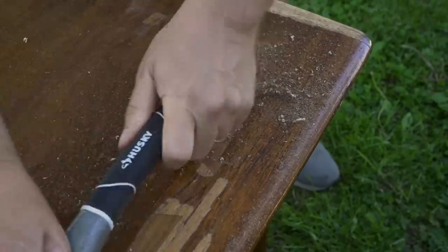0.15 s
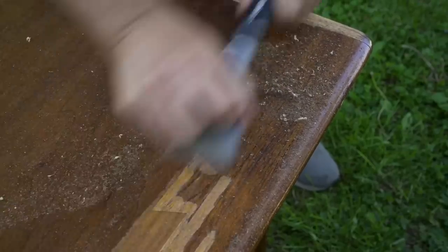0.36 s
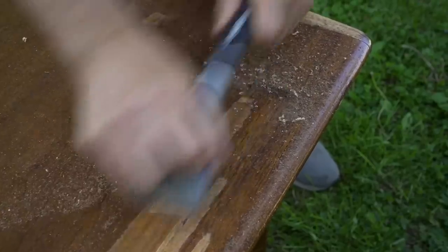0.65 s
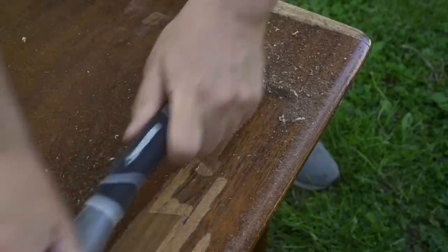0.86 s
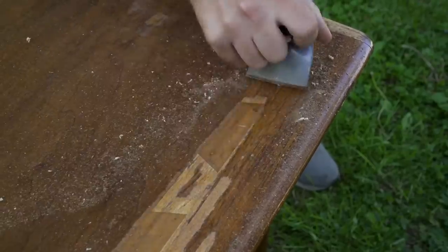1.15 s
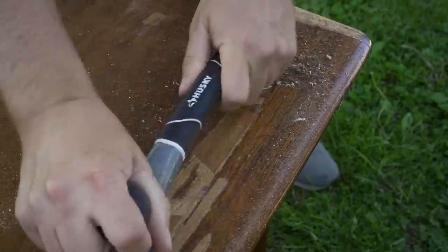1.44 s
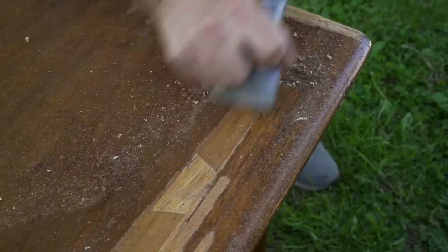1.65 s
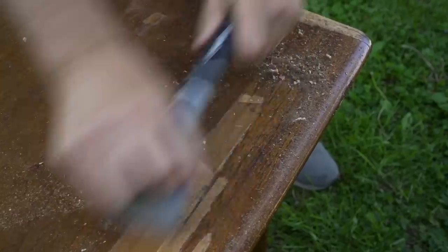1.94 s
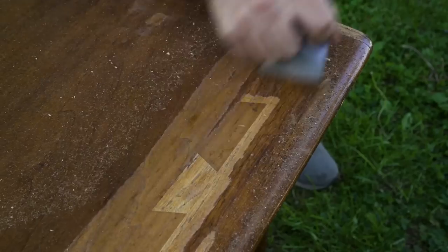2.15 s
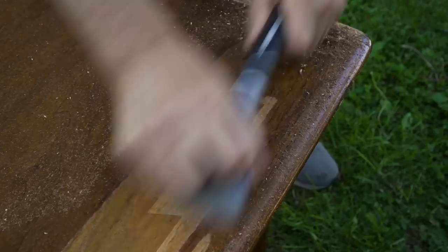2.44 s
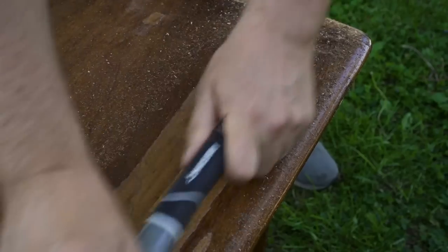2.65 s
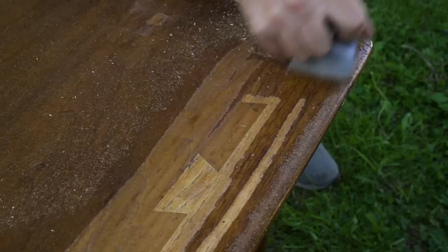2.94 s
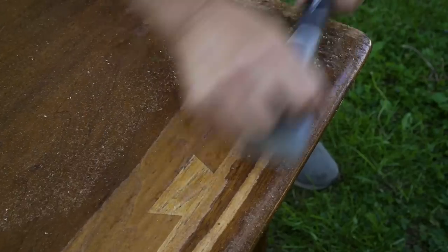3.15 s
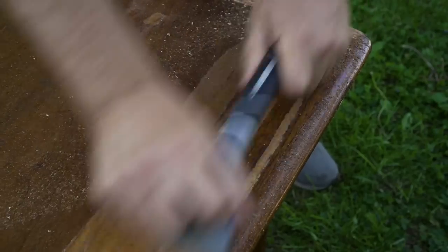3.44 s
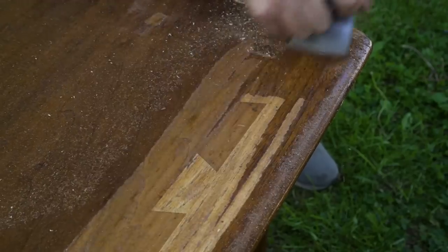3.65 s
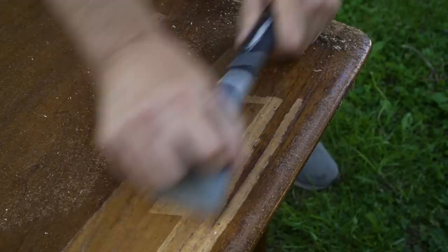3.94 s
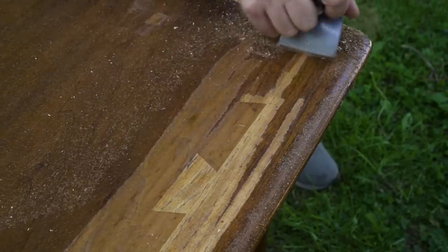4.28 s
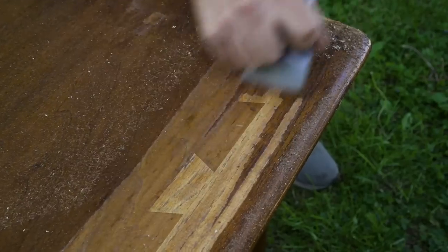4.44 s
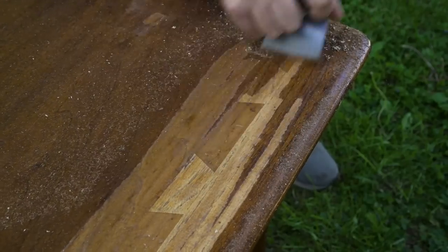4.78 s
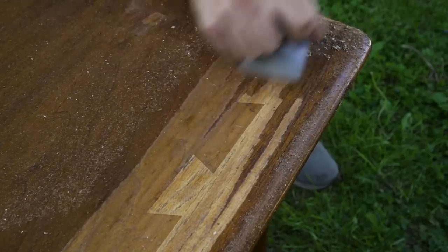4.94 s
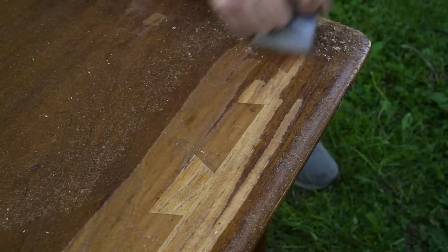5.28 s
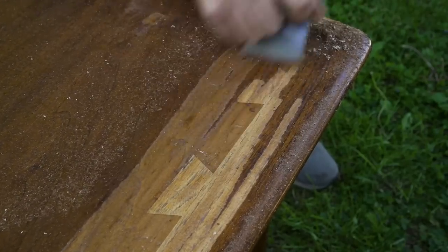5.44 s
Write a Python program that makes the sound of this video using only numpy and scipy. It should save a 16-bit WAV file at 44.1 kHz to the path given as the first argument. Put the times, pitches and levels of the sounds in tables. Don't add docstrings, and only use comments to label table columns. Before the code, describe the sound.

Quick dry scraping of old finish off a wooden table, with chattering blade, hissing shavings, small squeaks, taps and low table thuds.

```python
import sys
import numpy as np
from scipy import signal
from scipy.fft import rfft, irfft, next_fast_len
from scipy.io import wavfile
from scipy.ndimage import uniform_filter1d, map_coordinates

SR = 44100
rng = np.random.default_rng(int(sys.argv[2]) if len(sys.argv) > 2 else 0)


def log_audio(samples):
    frames = np.atleast_2d(samples).T
    limited = np.clip(frames, -1, 1)
    pcm = np.round(limited * 32767).astype(np.int16)
    wavfile.write(sys.argv[1], SR, pcm)


def how_loud(loudness_db):
    steps = np.asarray(loudness_db, float) / 20
    return 10 ** steps


N = 247401

# start_s, fastest_s, skid_db, light_chatter_db
PASSES = [(-0.1, 0.085, -58, -76), (0.24, 0.368, -52, -46), (0.567, 0.621, -52, -65),
          (0.9, 1.056, -53.5, -48), (1.233, 1.367, -55.5, -68), (1.529, 1.666, -52, -44),
          (1.809, 1.958, -58, -64), (2.31, 2.52, -54.5, -60), (2.704, 2.866, -52, -44),
          (3.074, 3.216, -54.5, -57.5), (3.427, 3.542, -50.5, -46), (3.773, 3.972, -55.5, -71),
          (4.101, 4.228, -50, -44), (4.387, 4.51, -55, -58), (4.672, 4.763, -54.5, -47.5),
          (4.909, 5.015, -56, -61), (5.187, 5.264, -53.5, -50), (5.414, 5.558, -59.5, -68)]
# centre_hz, width_hz, level_db
BLADE_MODES = [(1261, 14, -7), (1477, 96, 2.5), (1555, 17.3, -1), (1634, 55, -2.5)]
# centre_hz, width_hz, level_db
BLADE_OVERTONES = [(1778, 23, -1.5), (2034, 130, -1), (2227, 81, 1.5), (2273, 87, 2.5), (2680, 67, 0.5),
                   (2850, 98, -2), (2990, 380, -4), (3460, 210, -8)]
# centre_hz, width_hz, level_db
TABLE_MODES = [(343.2, 19.8, -5.5), (457.4, 40.6, -6), (567.4, 27.6, 0), (694, 63, -7.5), (810, 41.5, 0.5),
               (941.5, 60, -0.5), (1081, 123, -3), (1291, 34, 0.5)]
# freq_hz, density_db_per_hz
SKID_SPECTRUM = [(880, -10), (1500, -38), (1690, -5), (1840, -5.5), (2240, -1.5), (2450, -4.5),
                 (2680, -4.5), (3520, -6.5), (6410, -10.5), (7420, -20), (10700, -17.5), (14500, -28.5),
                 (15600, -48)]


def unit(x):
    return x / np.sqrt(np.mean(np.abs(x) ** 2) + 1e-20)


def wobble(rate_hz):
    knots = rng.standard_normal(int(N * rate_hz / SR) + 4)
    return map_coordinates(knots, [np.arange(N) * rate_hz / SR])


def filtered(x, response):
    m = next_fast_len(N + 8192)
    spectrum = rfft(x, m) * response(np.fft.rfftfreq(m, 1 / SR))
    return irfft(spectrum, m)[..., :N]


def coloured(x, spectrum):
    f, db = np.transpose(spectrum)
    return filtered(x, lambda hz: unit(how_loud(np.interp(np.log(hz + 1), np.log(f + 1), db))))


def resonance(f, k, centre_hz, width_hz):
    damping = 1j * f * width_hz
    return (-1) ** k * damping / (centre_hz * centre_hz - f * f + damping)


def ringing(force, modes, shift_db, rate_hz):
    out, power = np.zeros(N), 0
    for k, (centre_hz, width_hz, db) in enumerate(modes):
        coupling = how_loud(db + shift_db * wobble(rate_hz))
        out += filtered(force * coupling, lambda f: resonance(f, k, centre_hz, width_hz))
        power += np.mean(coupling ** 2) * np.pi * width_hz / SR
    return out / np.sqrt(power)


def struck(blows, modes):
    def response(f):
        return sum(how_loud(db) * resonance(f, k, c, w) for k, (c, w, db) in enumerate(modes))
    return filtered(blows, lambda f: unit(response(f)))


def slips(grain, clumps):
    draw = rng.random((2, N))
    sizes = how_loud(-3 * np.log(draw[1] + 0.015)) * rng.standard_normal(N)
    grains = (draw[0] < 0.02) * sizes
    return unit((rng.standard_normal(N) + grain * unit(grains)) * clumps)


def mottled(x, patchy_db):
    z = signal.stft(x, nperseg=512, noverlap=384)[2]
    field = rng.standard_normal(z.shape)
    field = uniform_filter1d(field, size=3, axis=0)
    field = uniform_filter1d(field, size=10, axis=1)
    return unit(signal.istft(z * how_loud(patchy_db * unit(field)), nperseg=512, noverlap=384)[1][:N])


def gains(tables, lead_s=0):
    t = np.arange(N) / SR
    out = 0
    for rows in tables:
        s, *cols = np.transpose(rows)
        on = (t > s[0] - lead_s) & (t < s[-1] + lead_s)
        out = np.maximum(out, [on * np.interp(t, s, how_loud(c / 3)) ** 3 for c in cols])
    return uniform_filter1d(out, size=30, axis=1)


def arches(tops_s, pointed, levels_db):
    last_rest_s = 5.75
    starts, t = np.transpose(PASSES)[0], np.arange(N) / SR
    knots = np.append(np.transpose([starts, tops_s]).ravel(), last_rest_s)
    ramp = np.interp(t, knots, np.arange(len(knots)) % 2)
    arch = (1 - pointed) * np.sin(np.pi / 2 * ramp) + pointed * ramp
    return arch, how_loud(levels_db[:, np.searchsorted(starts, t) - 1])


def passes():
    rows = np.transpose(PASSES)
    return arches(rows[1], 0.95, rows[2:])


def garden():
    # freq_hz, density_db_per_hz
    air = [(40, -32), (110, -5.5), (300, -0.5), (550, -23), (1500, -8.5), (3000, -16.5), (6000, -37),
           (15000, -48)]
    return how_loud(-72.5 + wobble(4.0)) * unit(coloured(rng.standard_normal(N), air))


def thuds():
    # freq_hz, density_db_per_hz
    rumble = [(18, -53.5), (30, -37.5), (43, -15), (124, 6), (167, 9), (220, -9.5), (300, -21), (390, -46),
              (660, -120)]
    # time_s, rumble_db
    lean = [(0, -70), (1.4, -75), (3.6, -70.5), (4.25, -78), (4.45, -62), (5.6, -71.5)]
    # start_s, level_db, pitch_hz, t60_s
    thumps = [(0.048, -68, 183, 0.12), (0.294, -62, 190, 0.13), (0.723, -56.5, 126, 0.1),
              (0.973, -66, 185, 0.11), (1.869, -60.5, 164, 0.11), (2.298, -64, 134, 0.1),
              (2.778, -52, 144, 0.035), (3.131, -62.5, 163, 0.14), (3.465, -55, 180, 0.053),
              (3.839, -64.5, 175, 0.085), (4.408, -51.5, 156, 0.061), (4.71, -52, 126, 0.083),
              (4.938, -52, 155, 0.088), (5.192, -50.5, 143, 0.068), (5.463, -59, 115, 0.1)]
    lumps = how_loud(1.36 * wobble(25))
    lumps = unit(lumps * coloured(rng.standard_normal(N), rumble))
    weight = how_loud(np.interp(np.arange(N) / SR, *np.transpose(lean)))
    out = weight * passes()[0] ** 0.14 * lumps
    out, t = np.pad(out, (0, SR)), np.arange(SR // 3) / SR
    for s, db, hz, t60 in thumps:
        envelope = how_loud(db + 8.5 - 60 * t / t60) * (1 - np.exp(-t / 0.0015))
        out[round(s * SR):][:len(t)] += envelope * np.sin(2 * np.pi * hz * t)
    return out[:N]


def squeaks():
    # start_s, from_hz, to_hz, level_db, length_s
    whistles = [(1.375, 2680, 2790, -51.5, 0.048), (1.636, 2590, 2590, -43, 0.023),
                (1.815, 2300, 1850, -82, 0.027), (2.87, 2230, 2230, -39.5, 0.031),
                (3.163, 2890, 2900, -58.5, 0.022), (3.231, 2200, 2234, -54.5, 0.041),
                (4.894, 2720, 2850, -64.5, 0.062), (3.945, 464, 456, -51.5, 0.058),
                (4.6, 700, 505, -51, 0.047), (2.009, 757, 810, -50, 0.027), (4.142, 824, 955, -58, 0.073)]
    out = np.zeros(N + SR)
    for s, from_hz, to_hz, db, length_s in whistles:
        u = np.linspace(0, 1, int(length_s * SR))
        phase = 2 * np.pi * np.cumsum(from_hz + (to_hz - from_hz) * u) / SR
        tone = np.sin(phase) + 0.16 * np.sin(2 * phase)
        out[round(s * SR):][:len(u)] += how_loud(db + 2.5) * np.sin(np.pi * u ** 0.6) * tone
    return out[:N] * how_loud(4.6 * wobble(260) + 2.0 * wobble(70))


def ticks():
    # start_s, peak_db, wood_db, t60_s
    taps = [(1.274, -42.5, -23, 0.023), (1.3026, -41, -26, 0.02), (1.341, -41, -15, 0.0074),
            (1.875, -36.5, -29, 0.0099), (2.3595, -39, -25, 0.0091), (2.4073, -39, -29, 0.019),
            (3.8596, -38.5, -7.5, 0.019), (3.9, -36.5, -27, 0.015), (4.7059, -36, -1.5, 0.0094),
            (4.9386, -48, 3, 0.008), (5.1815, -40, 3, 0.0075)]
    crack, blows, t = np.zeros(N + SR), np.zeros(N), np.arange(SR // 20) / SR
    for s, db, wood_db, t60 in taps:
        crack[round(s * SR):][:len(t)] += how_loud(db - 8 - 60 * t / t60) * rng.standard_normal(len(t))
        blows[round(s * SR)] = how_loud(db + wood_db + 8.0)
    crack = filtered(coloured(crack[:N], SKID_SPECTRUM), lambda hz: 1 / (1 + 1j * hz / 9000) ** 2)
    ping = how_loud(1.5) * struck(blows, BLADE_MODES + BLADE_OVERTONES)
    return crack + struck(blows, TABLE_MODES) + ping


def catches():
    # start_s, peak_db, blade_ring_db, table_knock_db
    ridges = [(0.0034, -36, 4, -8), (0.045, -54.5, -2, 16.5), (0.11, -36.5, -1, -13),
              (0.1433, -41.5, 13.5, 9.5), (0.299, -54, 6, -2), (0.409, -31, -10, -28),
              (0.502, -28, -3, -24), (0.619, -28, -4, -16), (0.6487, -30.5, -4.5, -23),
              (0.786, -38.5, 2.5, 4), (0.958, -53, 12, 6), (1.394, -35, 0, -2.5), (1.698, -40, 8, -9),
              (1.733, -26, 0.5, -21), (1.884, -35, -18, -10.5), (2.0186, -39, -3, 3), (2.7385, -55, 15, 4),
              (2.781, -51, 3, -16), (3.191, -46.5, -7, 3), (3.212, -37, -17, -7), (3.781, -55, 7, 3),
              (3.948, -42.5, 3, -10), (4.003, -34, -1, -9.5), (4.865, -49.5, 18.5, -7),
              (5.457, -58.5, 15, 7.5), (5.563, -39, -15, -7)]
    attack_s, hold_s = 0.00039, 0.009
    out, t = np.zeros((3, N + SR)), np.arange(SR // 8) / SR
    shape = (1 - np.exp(-t / attack_s)) / (1 + (t / hold_s) ** 4)
    for s, db, blade_db, knock_db in ridges:
        shares_db = np.array([[0], [blade_db], [knock_db + 6.5]])
        out[:, round(s * SR):][:, :len(t)] += how_loud(db - 14.5 + shares_db) * shape
    return out[:, :N]


def cutting():
    # time_s, cut_depth_db, blade_flex_db
    strokes = [
        [(0.33, -46.5, -42), (0.392, -42.5, -53), (0.404, -39.5, -38), (0.51, -52.5, -39)],
        [(1.062, -36, -44.5), (1.088, -46, -50), (1.128, -47, -49), (1.186, -90.5, -70)],
        [(1.643, -38, -46), (1.666, -49, -82)],
        [(2.04, -83, -52), (2.084, -51, -46.5), (2.14, -41.5, -47.5), (2.195, -43, -45), (2.204, -67.5, -66),
         (2.27, -70, -70), (2.298, -86, -81.5)],
        [(2.57, -79, -56), (2.61, -67.5, -55), (2.69, -96, -70)],
        [(2.788, -46, -36), (2.806, -60, -48), (2.858, -42.5, -58.5), (2.88, -41, -55), (2.977, -46, -45.5)],
        [(3.46, -52, -42.5), (3.485, -51.5, -39), (3.536, -39.5, -48.5), (3.654, -46.5, -49), (3.66, -55, -63)],
        [(4.271, -40.5, -50), (4.33, -49, -46.5), (4.351, -65, -61)],
        [(4.786, -47, -43.5), (4.802, -46, -49), (4.834, -57.5, -51), (4.881, -65, -50)],
        [(5.292, -41, -39.5), (5.304, -41, -37), (5.308, -54, -54)],
    ]
    # overtones_db, brightest_hiss_db
    seats = [(-1, 0), (4, 0), (-1.5, 0), (3, 0.5), (8, -19), (2.5, 0), (3, -1.5), (6, 2), (2.5, 5),
             (0.5, 3)]
    full_db, attack_s, brighten_db_per_s = -44, 0.0039, 31
    tear, chatter = gains(strokes, lead_s=0.0045)
    t, starts = np.arange(N) / SR, np.array([rows[0][0] for rows in strokes])
    which = np.searchsorted(starts - 0.01, t) - 1
    since_s = t - starts[which]
    overtone_db, sizzle_db = np.array(seats)[which].T
    depth = np.abs(tear) / how_loud(full_db)
    sizzle = how_loud(-9 + sizzle_db + brighten_db_per_s * np.clip(since_s, 0, 0.2)) * tear
    sizzle = sizzle * (1 - np.exp(-np.abs(since_s + 0.017) / attack_s))
    overtone = how_loud(full_db + 1.5 + overtone_db) * depth ** 0.78
    cut_drum = how_loud(full_db - 11.5) * depth ** 0.43
    return tear, sizzle, chatter, overtone, cut_drum


def scraper():
    # freq_hz, density_db_per_hz
    hiss = [(1940, -36), (3300, -9), (3550, 3.5), (4050, -4.5), (4480, 3.5), (5290, -1.5), (6350, 2.5),
            (7800, -7.5), (10100, -39), (17200, -120)]
    # freq_hz, density_db_per_hz
    bright = [(4470, -19), (7600, -41), (8120, -8.5), (9110, -5), (9450, 5), (9920, 5.5), (10400, -3),
              (12500, 2), (14000, -12), (15600, -13.5)]
    # centre_hz, width_hz, level_db
    whisper = [(10560, 700, -1.5), (11050, 810, -1.5), (12400, 1100, -1)]
    # time_s, low_modes_db, upper_modes_db
    drumming = [(0.12, -52, -50), (0.36, -57.5, -54.5), (0.66, -49.5, -48.5), (1.08, -57, -57.5),
                (1.39, -49, -51.5), (1.65, -59.5, -55), (1.96, -55, -58), (2.52, -49, -49.5),
                (2.82, -52, -54), (3.25, -50, -49.5), (3.5, -53.5, -53.5), (3.98, -54, -52),
                (4.19, -54, -55.5), (4.51, -50, -51.5), (4.74, -57, -61), (5.06, -49, -51),
                (5.25, -59.5, -59.5), (5.575, -58.5, -63)]
    stick_speed, rest_speed = 0.046, 0.024
    tear, sizzle, chatter, overtone, cut_drum = cutting()
    hand, (skid, light_chatter) = passes()
    crossings = np.transpose(drumming)
    lively, (low_drum, upper_drum) = arches(crossings[0], 0.87, crossings[1:])
    skid = skid * np.clip(hand - stick_speed, 1e-4, 1) ** 0.88
    light_chatter = light_chatter * (hand ** 1.96 + rest_speed)
    low_drum = low_drum * (lively + rest_speed) ** 0.93
    upper_drum = upper_drum * lively ** 0.89 + cut_drum
    bite, ring, knock = catches()
    clumps = how_loud(0.59 * wobble(140) + wobble(35))

    out = coloured(mottled(slips(0.32, clumps), patchy_db=3) * (tear + 0.63 * bite), hiss)
    sizzle = sizzle + 0.2 * bite + how_loud(-19.5) * light_chatter
    out += coloured(mottled(slips(0.33, clumps), patchy_db=-2.5) * sizzle, bright)

    slide = coloured(mottled(slips(0.59, clumps), patchy_db=4.0) * (skid + 0.35 * ring), SKID_SPECTRUM)
    speed = np.clip(skid / how_loud(-47.0), 0, 1.3) ** 0.4
    highs = filtered(slide, lambda hz: 1 / (1 + (10500 / (hz + 1)) ** 6))
    out += slide - (1 - speed) * highs
    singing = slips(0.52, clumps) * skid * speed ** 2.5 * how_loud(-13.5)
    out += ringing(singing, whisper, shift_db=3.5, rate_hz=7.5)

    flexing = slips(0.87, clumps) * (chatter + light_chatter + 0.38 * ring)
    out += ringing(flexing, BLADE_MODES, shift_db=2.24, rate_hz=23)
    out += ringing(slips(0.55, clumps) * (overtone + 0.65 * ring), BLADE_OVERTONES, shift_db=4.0, rate_hz=32)

    low_force = slips(0.78, clumps) * (low_drum + 0.95 * knock)
    upper_force = slips(1.01, clumps) * (upper_drum + 0.93 * knock)
    drum = ringing(low_force, TABLE_MODES[:4], shift_db=2.5, rate_hz=20)
    drum += ringing(upper_force, TABLE_MODES[4:], shift_db=1.5, rate_hz=22)
    radiated = lambda hz: 1j * hz / (200 + 1j * hz) / (1 + 1j * hz / 1800) ** 2
    return out + how_loud(0.5) * filtered(drum, radiated)


def scene():
    near = scraper() + squeaks() + ticks()
    bounce = how_loud(-17.5) * np.pad(near, (190, 0))[:N]
    return (near + bounce + thuds() + garden())[None]


def band_limit(x):
    return signal.sosfilt(signal.butter(12, 15800, fs=SR, output="sos"), x)


def record(dry):
    band = lambda hz: (1j * hz / (72 + 1j * hz)) ** 4 * (hz < 15800)
    return band_limit(filtered(dry, band))


dry = scene()
out = record(dry)
log_audio(out)
```